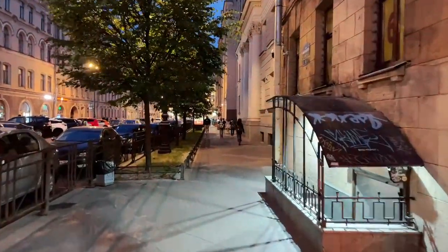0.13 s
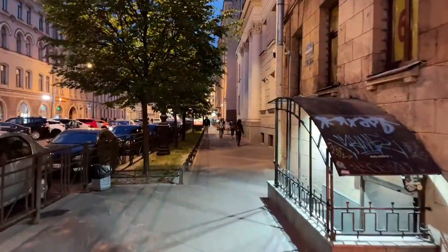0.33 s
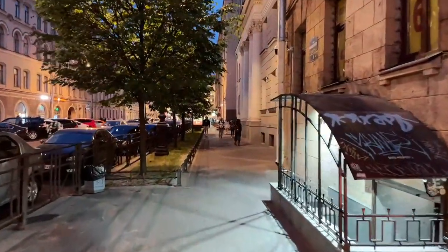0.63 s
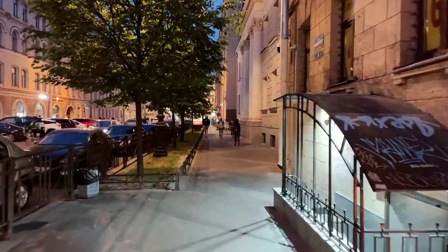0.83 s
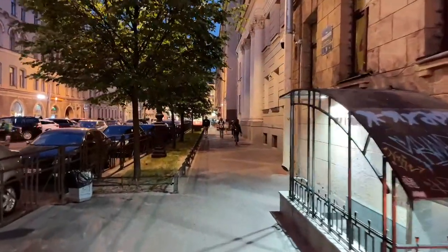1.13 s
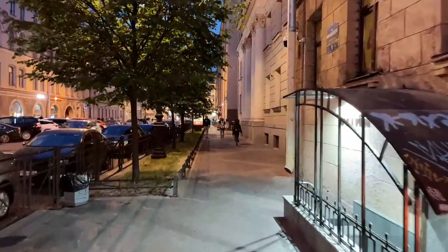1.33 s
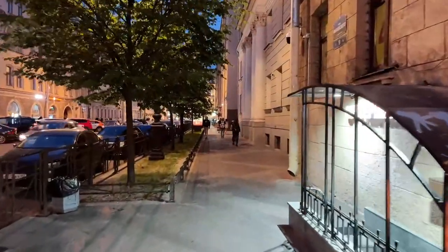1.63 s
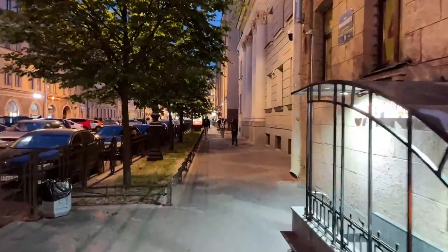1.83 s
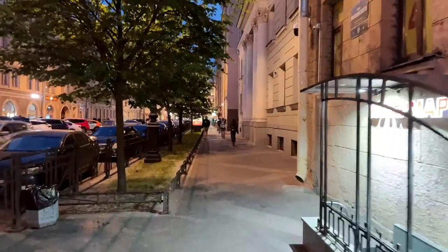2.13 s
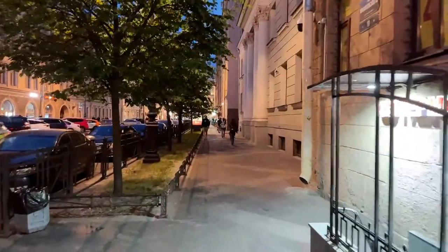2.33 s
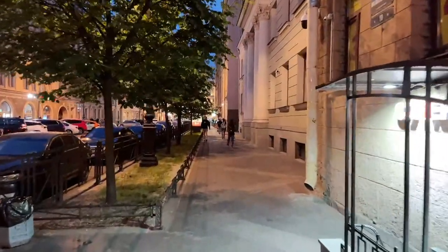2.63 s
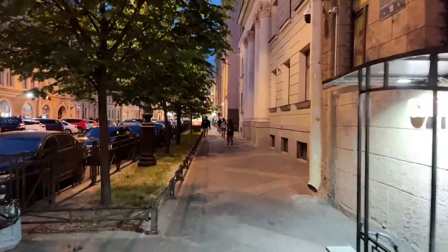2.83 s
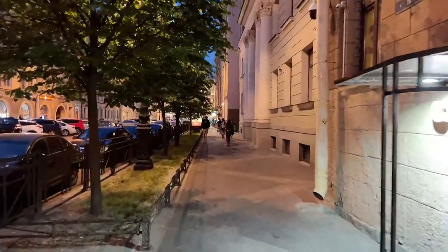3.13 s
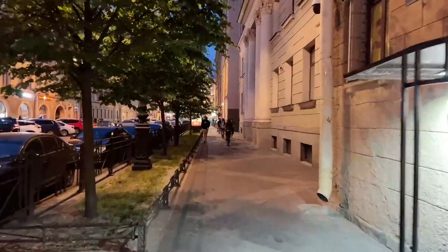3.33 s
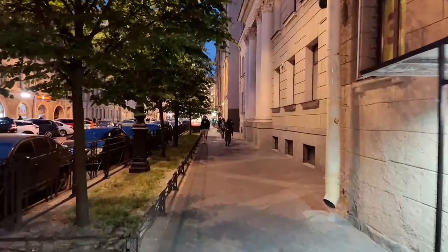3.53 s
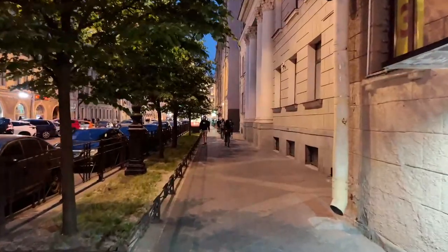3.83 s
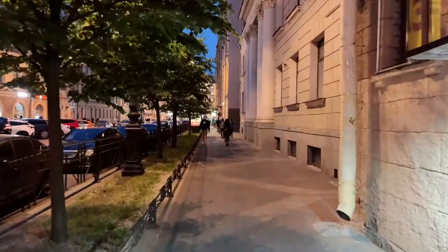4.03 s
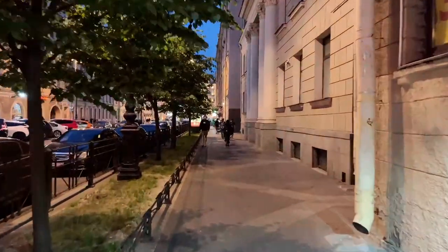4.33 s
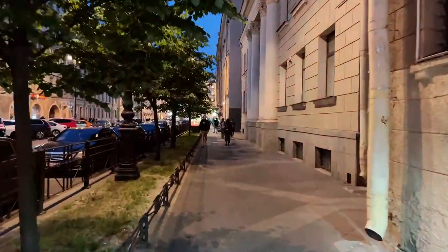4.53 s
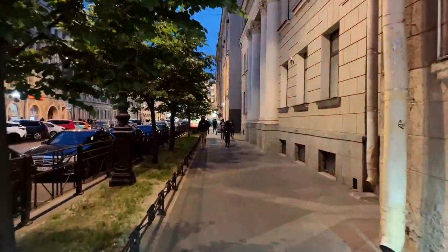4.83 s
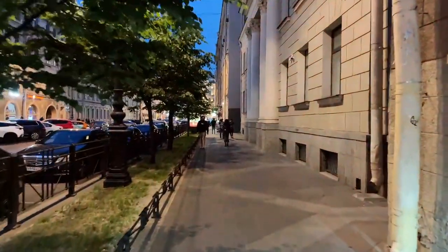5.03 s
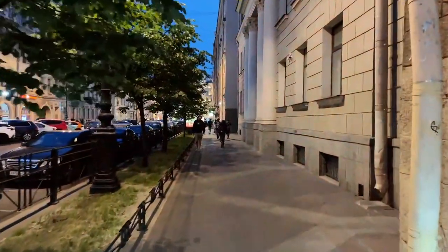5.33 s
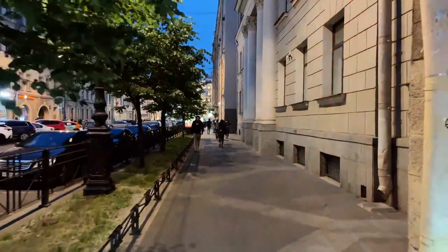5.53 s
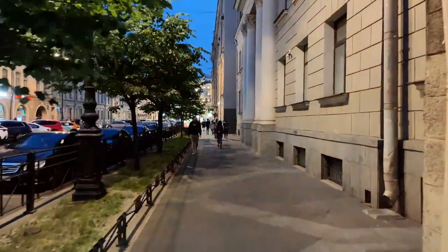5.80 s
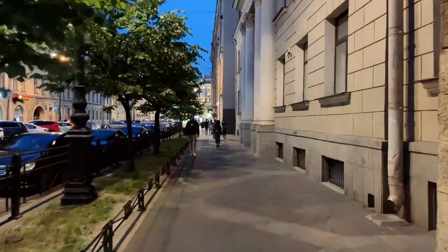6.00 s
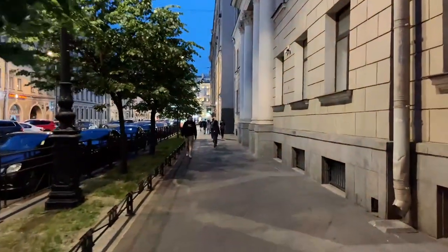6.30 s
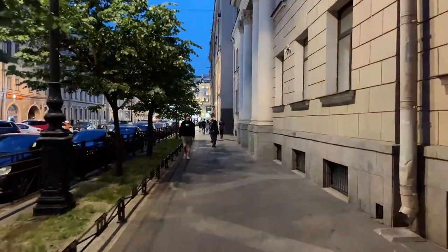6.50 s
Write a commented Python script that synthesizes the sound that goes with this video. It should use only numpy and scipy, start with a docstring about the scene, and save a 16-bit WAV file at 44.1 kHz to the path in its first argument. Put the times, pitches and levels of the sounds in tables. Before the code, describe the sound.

On a city pavement between stone fronts, a deep car exhaust rises from faint to a strong boom within two seconds, then keeps surging and easing over a steady traffic rumble and airy tyre hiss. After three seconds, dull low thumps, small gritty scuffs and bassy air gusts strike close to the handheld microphone.

```python
"""A city street between tall stone fronts, heard from the pavement.
From the start a car with a deep exhaust surges: its firing note booms, with octave and rough orders, over
other engines' gliding notes and a bed of shaped-noise rumble, roar and hiss that swells as cars roll by.
Filtered-noise shoe scuffs and grit ticks come early, then hums and hisses swell out of the roar.
After three seconds dull thumps (damped low swings) and bassy gusts join in, on to near the end."""
import sys
import numpy as np
from scipy import signal
from scipy.io import wavfile
from scipy.ndimage import uniform_filter1d

SR = 44100
rng = np.random.default_rng(int(sys.argv[2]) if len(sys.argv) > 2 else 0)


def dump_mix(stems):
    """Bounce the given channels to the path in sys.argv[1] as a 16-bit WAV at rate SR."""
    frames = np.atleast_2d(stems).T  # one column per channel
    limited = np.clip(frames, -1, 1)  # hard clip at full scale
    pcm = np.round(limited * 32767).astype(np.int16)
    wavfile.write(sys.argv[1], SR, pcm)


N = 293706
TIME = np.arange(N) / SR


def from_db(db):
    """Decibels to gain."""
    return 10 ** (np.asarray(db) / 20)


def rms_one(x):
    """Scale to unit power."""
    return x / np.sqrt(np.mean(x ** 2) + 1e-20)


def in_time(rows):
    """Each column of a curve, sample by sample."""
    s, *columns = np.transpose(rows)
    return [np.interp(TIME, s, c) for c in columns]


def drift(corner_hz):
    """Slow chance of spread 1: coarse noise through a double one-pole low-pass."""
    step = 40  # samples per coarse draw
    warmup = 2000
    pole = np.exp(-2 * np.pi * corner_hz * step / SR)
    coarse = rng.standard_normal(N // step + warmup + 2)
    slow = signal.lfilter([1], [1, -2 * pole, pole ** 2], coarse)[warmup:]
    return np.interp(np.arange(N) / step, np.arange(len(slow)), rms_one(slow))


def band_noise(centre_hz, octaves, order=2):
    """Unit-power noise in one band."""
    warmup = 4000
    half_width = 2 ** (octaves / 2)
    edges_hz = np.clip([centre_hz / half_width, centre_hz * half_width], 10, 0.45 * SR)
    sos = signal.butter(order, edges_hz, "band", fs=SR, output="sos")
    return rms_one(signal.sosfilt(sos, rng.standard_normal(N + warmup))[warmup:])


def shaped_noise(spectrum, flicker_db):
    """Third-octave bands along a spectrum, each flickering by itself; unit power."""
    hz, db = np.transpose(spectrum)
    third = 1 / 3
    centres_hz = 25 * 2 ** np.arange(0, 9.4, third)
    out = np.zeros(N)
    for centre_hz in centres_hz[(centres_hz >= hz[0]) & (centres_hz <= hz[-1])]:
        level_db = np.interp(np.log(centre_hz), np.log(hz), db) + flicker_db * drift(9.8)
        # bandwidth grows with the centre, so per-Hz level gains its square root
        out += np.sqrt(centre_hz) * from_db(level_db) * band_noise(centre_hz, third)
    return rms_one(out)


def exhaust(note_db=-0.5, octave_db=-1.5, unsteady_db=4.5, octave_unsteady_db=0.6,
            rough=0.5, firing_rough=0.095, octave_rough=0.14):
    """The silencer leaves a nearly pure firing note and octave; uneven cylinders add weak, rough orders."""
    # Engine speed, climbing in each surge. Each row: time in seconds, firing rate in Hz.
    firing_curve = [(0.0, 54.8), (0.25, 57.3), (0.5, 62.54), (0.85, 72.84), (.97, 74.2), (1.08, 38.85),
                    (1.25, 47.5), (1.35, 55), (1.5, 62.9), (1.65, 67.8), (1.8, 71.7), (1.9, 67.4),
                    (2.0, 56.6), (2.08, 51.35), (2.22, 56.5), (2.32, 63.2), (2.48, 62), (2.65, 67.5),
                    (2.8, 71.63), (3.0, 69.25), (3.14, 63.7), (3.3, 72.53), (3.67, 65.32), (4.03, 50.4),
                    (4.28, 50.36), (4.5, 53.62), (4.9, 57.75), (5.25, 62.83), (5.6, 67.86), (6.05, 74.47),
                    (6.25, 71.8), (6.4, 59.5), (6.66, 58.86)]
    # Engine load as exhaust boom. Each row: time in seconds, level in dB before note_db and unsteadiness.
    load_curve = [(0.0, -38), (.27, -33), (.35, -43), (.47, -29), (0.61, -44), (0.68, -22), (.78, -21.5),
                  (.9, -40), (1.1, -62), (1.22, -27.5), (1.38, -15), (1.5, -12.5), (1.6, -10.5), (1.75, -8),
                  (1.86, -10.5), (1.95, -10), (2.0, -27), (2.04, -19.5), (2.14, -21.5), (2.3, -12.5),
                  (2.41, -19.5), (2.52, -16.5), (2.6, -19), (2.7, -16), (2.93, -17), (3.0, -21),
                  (3.12, -24), (3.17, -37), (3.26, -23), (3.38, -28), (3.57, -21.5), (3.8, -29),
                  (4.15, -31.5), (4.3, -22), (4.4, -33), (4.51, -17.5), (4.68, -17), (4.83, -22.5),
                  (4.95, -18.5), (5.2, -25.5), (5.3, -23), (5.46, -16), (5.575, -18), (5.61, -20.5),
                  (5.7, -19), (5.82, -28), (5.9, -20.5), (6.03, -21.5), (6.1, -27), (6.22, -30.5),
                  (6.66, -34.5)]
    # Growl, the firing note's octave. Each row: time in seconds, level in dB before octave_db and drift.
    growl_curve = [(0, -50), (1.05, -47), (1.22, -31.5), (1.37, -20), (1.47, -24.5), (1.56, -21),
                   (1.68, -26), (1.8, -28), (1.95, -28.5), (2.08, -30.5), (2.24, -20.5), (2.38, -35),
                   (2.48, -27), (2.56, -39.5), (2.8, -31), (2.95, -46), (4.05, -36.5), (4.18, -26),
                   (4.3, -31.5), (4.39, -24.5), (4.54, -22), (4.66, -31), (4.78, -26.5), (4.88, -26.5),
                   (4.99, -21), (5.1, -28.5), (5.25, -28), (5.42, -36.5), (5.6, -31.5), (6.03, -32),
                   (6.2, -43), (6.66, -43.5)]
    # Weaker engine orders. Each row: multiple of the firing rate, level in dB against the overtones.
    weak_orders = [(1.5, -11.5), (2.5, -5.5), (3, -4), (4, -10.5)]
    overtone_db, growl_share, cruise_hz = -45.5, 0.24, 62
    lug_db_per_hz, climb_db_per_hz_per_s = 0.3465, 0.13

    firing_hz, = in_time(firing_curve)
    load_db, = in_time(load_curve)
    growl_db, = in_time(growl_curve)
    turn = 2 * np.pi * np.cumsum(firing_hz) / SR

    # fires most evenly under full load
    slack = np.clip((load_db.max() - load_db) / np.ptp(load_db), 0, 1)
    note_gain = from_db(load_db + note_db + unsteady_db * slack * drift(14))
    note_gain = note_gain * (1 + firing_rough * np.sqrt(slack) * drift(40))
    out = note_gain * np.sin(turn)

    octave_gain = from_db(growl_db + octave_db + octave_unsteady_db * drift(12))
    octave_phase = 2 * turn + 2 * np.pi * rng.random() + octave_rough * drift(25)
    out += octave_gain * np.sin(octave_phase)

    # overtones follow a share of the growl and grow as the engine lugs or climbs fast
    climb_hz_per_s = uniform_filter1d(np.maximum(np.gradient(firing_hz) * SR, 0), size=SR // 10)
    overtones_db = overtone_db + growl_share * (growl_db - growl_db.mean())
    overtones_db += lug_db_per_hz * (cruise_hz - firing_hz)
    overtones_db += climb_db_per_hz_per_s * climb_hz_per_s
    for order, db in weak_orders:
        phase = order * turn + 2 * np.pi * rng.random() + rough * drift(7.5)
        out += from_db(overtones_db + db) * (1 + rough * drift(25)) * np.sin(phase)
    return np.sqrt(2) * out  # sine levels are RMS


def other_cars(rough=0.52, waver_rad=0.2):
    """Each further engine is one gliding, wavering note that swells and fades."""
    # Engines changing speed. Each row: start and end in seconds, start and end pitch in Hz, peak level in dB.
    glides = [(0, 0.49, 82.9, 92.2, -35), (0, 1.314, 233.3, 220.8, -45), (1.05, 1.3, 79.3, 99.3, -34),
              (2.01, 2.202, 148, 162.2, -32.5), (2.202, 2.764, 181, 201, -36),
              (2.8, 3.054, 214, 199.8, -37.5), (3.25, 3.7, 140.4, 140.5, -42), (3.299, 3.85, 86, 97.5, -35),
              (3.778, 4.016, 124.8, 106, -30.5), (4.009, 5.383, 198, 254.6, -43.5)]
    out = np.zeros(N)
    for start, end, from_hz, to_hz, db in glides:
        progress = np.clip((TIME - start) / (end - start), 0, 1)
        pitch_hz = from_hz + (to_hz - from_hz) * progress
        phase = 2 * np.pi * np.cumsum(pitch_hz) / SR + waver_rad * drift(9.5)
        gain = from_db(db) * np.sin(np.pi * progress) * (1 + rough * drift(19))
        out += gain * np.sin(phase + 2 * np.pi * rng.random())
    return np.sqrt(2) * out


def traffic(roar_trim_db=-0.55, tread_grain_db=0.76):
    """Engines and tyres merge into a steady bed; each car rolling by adds rush and hiss as it comes near."""
    # Noise spectra of engines, far tyres, near tyres and treads. Each row: frequency in Hz, level in dB per Hz.
    rumble_spectrum = [(25, -9), (42, 2), (60, 8), (85, 5), (130, -3.5), (220, -5), (320, -9.5),
                       (480, -16.5), (700, -24.5), (1200, -37)]
    roar_spectrum = [(250, -5.5), (450, -3.5), (620, -2.5), (850, 3), (1050, -3.5), (1400, -7), (2000, -20),
                     (3500, -23)]
    rush_spectrum = [(700, 0.5), (1200, -6), (1700, 5), (2300, 6.5), (3000, -6), (4000, -4), (6000, -14)]
    hiss_spectrum = [(2000, -12), (3200, 3), (4000, -1.5), (5000, 1.5), (6500, -4)]
    # Far tyre roar. Each row: time in seconds, level in dB before roar_trim_db.
    roar_curve = [(0, -42), (1.05, -42), (1.45, -41), (2.55, -41.5), (2.9, -44.5), (4.1, -44), (5.0, -42),
                  (5.7, -42), (6.66, -40)]
    # Cars rolling by. Each row: nearest point and half length in seconds, tyre rush and tread hiss in dB.
    passes = [(1.562, 0.34, -54.5, -56), (2.503, 0.7, -50.5, -56.5), (4.39, 0.98, -76, -61.5),
              (6.349, 0.6, -59, -77)]
    rumble_db, rush_floor_db, hiss_floor_db = -31, -53, -64
    sizzle_db, sizzle_hz, sizzle_octaves = -10, 11180, 0.34  # fine tread sizzle, against the hiss

    far_db, = in_time(roar_curve)
    rush_gain, hiss_gain = from_db(rush_floor_db), from_db(hiss_floor_db)
    for s, half_s, rush_db, hiss_db in passes:
        nearness = 1 / (1 + ((TIME - s) / half_s) ** 2)
        rush_gain = np.hypot(rush_gain, from_db(rush_db) * nearness)
        hiss_gain = np.hypot(hiss_gain, from_db(hiss_db) * nearness)
    rumble = from_db(rumble_db) * shaped_noise(rumble_spectrum, flicker_db=1.0)
    roar = from_db(far_db + roar_trim_db) * shaped_noise(roar_spectrum, flicker_db=1.73)
    grain = from_db(tread_grain_db * drift(45))
    rush = rush_gain * grain * shaped_noise(rush_spectrum, flicker_db=1.7)
    hiss = hiss_gain * shaped_noise(hiss_spectrum, flicker_db=1.34)
    sizzle_gain = hiss_gain * from_db(sizzle_db + 0.7 * drift(6))
    sizzle = sizzle_gain * band_noise(sizzle_hz, sizzle_octaves, order=3)
    return rumble + roar + rush + hiss + sizzle


def scuffs(grain_db=-0.5):
    """Soles rub over grit: grainy bursts that rise quickly and fade."""
    # Soft shoe scuffs. Each row: peak in seconds, level in dB, centre in Hz, width in octaves,
    # rise and fade in seconds.
    scuff_rows = [(.11, -64, 11300, 0.2, .05, 0.15), (.79, -74, 11100, 0.26, .053, 0.089),
                  (3.615, -52.5, 3995, 0.52, .004, 0.039), (3.775, -65, 12480, .5, .004, .014),
                  (3.87, -49.5, 3000, 0.91, 0.0088, 0.049), (3.872, -64, 12000, .4, .015, 0.07),
                  (4.285, -55, 5920, 0.29, .008, 0.039), (4.30, -65.5, 11990, 0.36, .02, 0.036),
                  (4.645, -60, 11300, 0.13, .003, 0.026)]
    out = np.zeros(N)
    for s, db, hz, octaves, rise_s, fade_s in scuff_rows:
        decay = np.maximum((s - TIME) / rise_s, (TIME - s) / fade_s)
        out += from_db(db) * np.exp(-np.minimum(decay, 20)) * band_noise(hz, octaves)
    return out * from_db(grain_db * drift(150))


def ticks(fade_s=0.0048, trim_db=-3):
    """A grain of grit cracks at once over a broad band and is gone in a few milliseconds."""
    # Grit cracking underfoot. Each row: start in seconds, level in dB before trim_db, centre in Hz.
    tick_rows = [(0.178, -42, 3100), (.532, -53, 4200), (3.603, -43, 3760), (3.618, -58, 5150),
                 (4.094, -51, 5653), (4.276, -58, 5803), (4.29, -49, 5000), (4.594, -45.5, 3507),
                 (6.04, -54, 4516)]
    out = np.zeros(N)
    for s, db, hz in tick_rows:
        shape = (TIME >= s) * np.exp(-np.clip(TIME - s, 0, 0.2) / fade_s)
        out += from_db(db + trim_db) * shape * band_noise(hz, octaves=1)
    return out


def swells():
    """Resonances swell out of the roar: hollow hums low down, hisses higher up, as narrow noise bands."""
    # Each row: peak in seconds, level in dB, centre in Hz, width in octaves, half length in seconds.
    swell_rows = [(0.567, -41.5, 450, 0.13, 0.061), (1.599, -43, 460, 0.73, 0.67),
                  (1.515, -61.5, 4680, 0.11, 0.33), (1.82, -52.5, 2060, 0.71, 0.17),
                  (2.406, -57, 5300, 0.32, 0.28), (2.74, -56, 2260, 0.29, 0.62),
                  (2.797, -48, 435, 0.19, 0.47), (3.098, -56.5, 1680, 0.8, 0.42),
                  (3.6, -55, 1460, .25, .35), (4.35, -44, 213.3, 0.31, .2), (4.85, -47.5, 316, 0.38, 0.34),
                  (4.752, -64.5, 4400, 0.25, 1), (4.9, -49.5, 570, 0.34, 0.35),
                  (5.222, -53, 1390, 0.17, .12), (6.557, -65.5, 6060, 0.18, 0.75)]
    out = np.zeros(N)
    for s, db, hz, octaves, half_s in swell_rows:
        shape = np.exp(-((TIME - s) / half_s) ** 2)
        out += from_db(db) * shape * band_noise(hz, octaves)
    return out


def thumps(knock_hz=235, knock_s=0.0032, rise_s=0.0022, thud_db=-17, thud_hz=250, thud_s=0.0052):
    """Each thump is a heavily damped low swing with a higher knock and a brief noisy thud."""
    # Each row: start in seconds, level in dB, pitch in Hz, fade in seconds, knock and thud in dB
    # against the swing (thud_db comes on top).
    thump_rows = [(3.17, -25, 151.3, 0.0098, -6), (3.621, -22, 85, .014, -6),
                  (3.768, -18, 100.5, 0.0085, -3), (3.838, -14.5, 134, 0.021, -15),
                  (3.853, -11, 91, .012, -15), (3.896, -18, 75.6, 0.016, -18),
                  (3.949, -11.5, 91, 0.017, -5), (4.023, -14, 60.6, .02, -12),
                  (4.038, -13.5, 66, 0.021, -2), (5.584, -8.5, 81, 0.023, -1.5),
                  (5.614, -5, 128.3, 0.0094, -9), (5.6679, -11, 200, 0.0047, -2),
                  (5.6732, -4, 76, 0.021, -12), (5.88, -30, 105, 0.015, -1), (6.129, -13, 75.1, 0.026, -18),
                  (6.154, -12, 80.1, .016, -5), (6.171, -7.5, 69.3, 0.024, -8),
                  (6.335, -15, 113, 0.0093, -3), (6.418, -7, 103, 0.0093, -10),
                  (6.497, -16.5, 134.8, 0.0077, -2.5), (6.56, -23, 202, 0.013, -8)]
    out = np.zeros(N)
    thud_noise = from_db(thud_db) * band_noise(thud_hz, 0.87, order=3)
    for s, db, hz, fade_s, knock_db in thump_rows:
        age = np.clip(TIME - s, 0, 0.5)
        swing = np.exp(-age / fade_s) * np.sin(2 * np.pi * hz * age)
        knock = np.exp(-age / knock_s) * np.sin(2 * np.pi * knock_hz * age)
        thud = np.exp(-age / thud_s) * thud_noise
        onset = 1 - np.exp(-age / rise_s)
        out += from_db(db) * onset * (swing + from_db(knock_db) * (knock + thud))
    return out


def gusts(centre_hz=78, octaves=1.05):
    """Moving air buffets the microphone with lumpy bass."""
    # Gusts of air. Each row: peak in seconds, level in dB, half length in seconds.
    gust_rows = [(3.575, -35.5, 0.16), (3.76, -29.5, 0.13), (3.963, -29, 0.094), (5.63, -27.5, 0.06),
                 (5.77, -23, 0.052), (5.896, -22, 0.039), (6.143, -19.5, 0.048), (6.397, -30, 0.045)]
    strength = np.zeros(N)
    for s, db, half_s in gust_rows:
        strength += from_db(db) * np.exp(-((TIME - s) / half_s) ** 2)
    return strength * band_noise(centre_hz, octaves)


def scene():
    """The car, the traffic around it and the small sounds on the pavement."""
    street = exhaust() + other_cars() + traffic() + swells()
    close_by = scuffs() + ticks() + thumps() + gusts()
    return (street + close_by)[None]


def record(dry):
    """The sound eases in and out; the microphone sheds the deepest bass and cuts the top."""
    ease_s, bass_cut_hz, top_cut_hz = 0.004, 31, 13900
    edge_distance_s = np.minimum(TIME, TIME[-1] - TIME)
    eased = dry * np.minimum(edge_distance_s / ease_s, 1)
    thinned = signal.sosfilt(signal.butter(2, bass_cut_hz, "high", fs=SR, output="sos"), eased)
    return signal.sosfilt(signal.ellip(10, 0.1, 80, top_cut_hz, fs=SR, output="sos"), thinned)


dry = scene()
out = record(dry)
dump_mix(out)
```